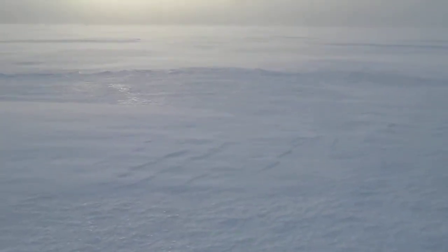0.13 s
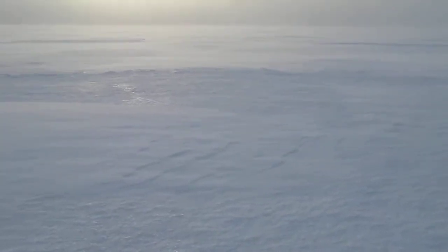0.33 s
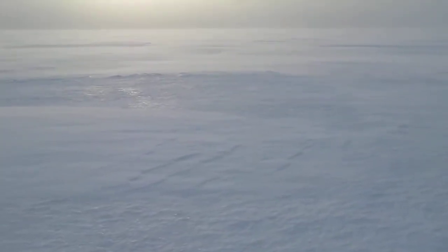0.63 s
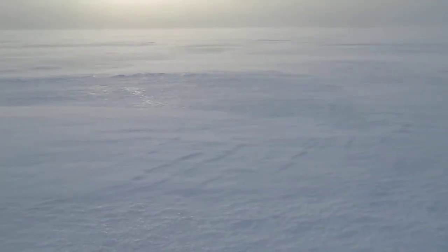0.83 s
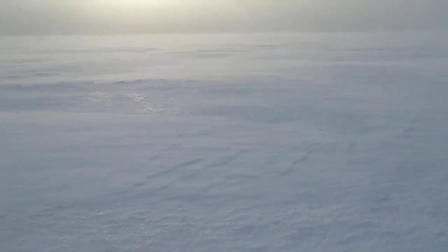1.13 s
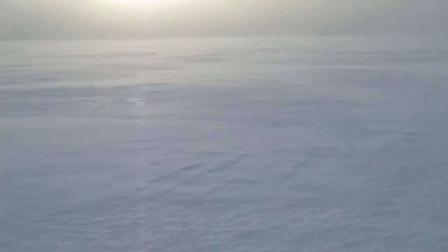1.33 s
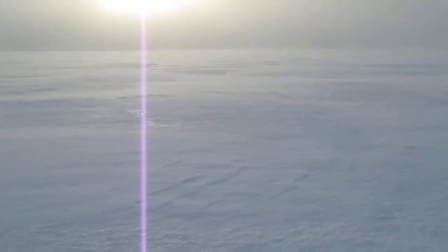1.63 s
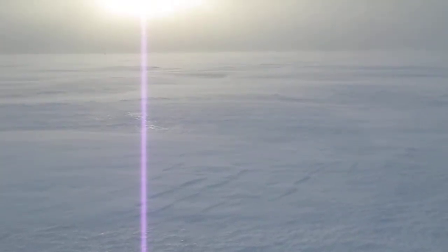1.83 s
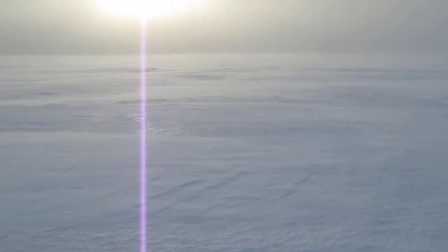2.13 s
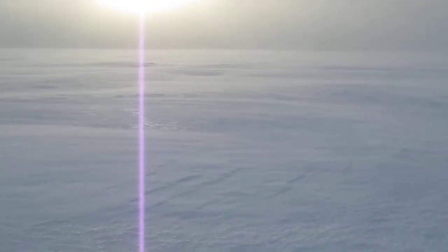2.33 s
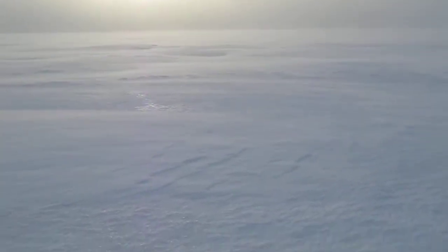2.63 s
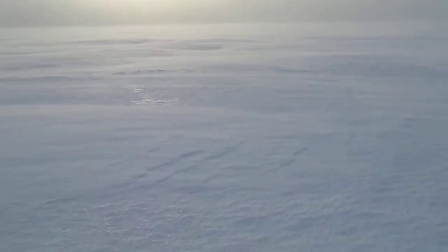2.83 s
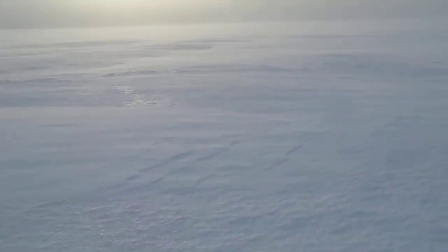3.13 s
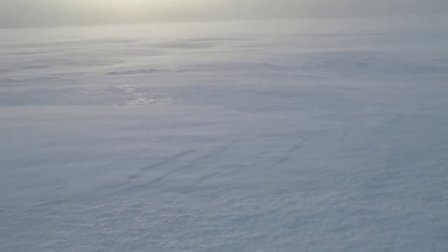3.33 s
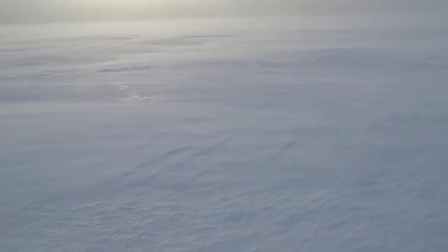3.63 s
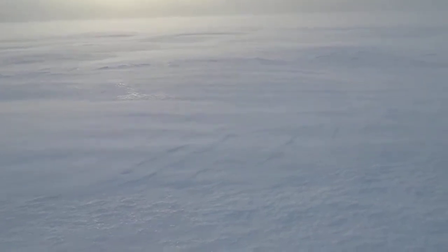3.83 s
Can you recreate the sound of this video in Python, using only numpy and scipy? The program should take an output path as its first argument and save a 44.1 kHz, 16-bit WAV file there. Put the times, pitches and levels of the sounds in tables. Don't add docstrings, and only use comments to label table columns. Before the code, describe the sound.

Wind rumbles quietly over open snow with soft puffs, then a violent thump and clipped slap hit the exposed microphone; a brush, crisp crunching and ice ticks follow before a gale roars in.

```python
import sys
import numpy as np
from scipy import signal
from scipy.fft import rfft, irfft, next_fast_len
from scipy.io import wavfile
from scipy.ndimage import map_coordinates

SR = 44100
rng = np.random.default_rng(int(sys.argv[2]) if len(sys.argv) > 2 else 0)


def volts(x):
    e = np.asarray(x, float) / 20
    return 10 ** e


def master(y):
    cut = np.clip(np.atleast_2d(y).T, -1, 1)
    pcm = np.round(cut * 32767)
    wavfile.write(sys.argv[1], SR, pcm.astype(np.int16))


N = 176400

# freq_hz, density_db
HISS_COLOUR = [(290, -16.5), (500, -6.5), (944, -12.5), (1260, -18), (2870, -22.5), (3360, -21),
               (4970, -26.5), (8720, -19.5), (15800, -37)]
# start_s, rise_s, hold_s, fall_s, level_db
FAR_BRUSHES = [
    (.3, 0.018, 0.29, 0.014, -62.5),
    (.7, 0.074, 0.1, 0.6, -60),
    (.9, .05, 0.2, 0.037, -72.5),
    (1.3, 0.29, 0.47, 0.04, -67.5),
    (2.8, 0.036, .18, .1, -67),
]
# freq_hz, density_db
FAR_BRUSH_COLOUR = [(1180, -28), (2000, -2), (2870, -2.5), (3270, 1), (4620, 3.5), (6640, -0.5),
                    (8390, 6.5), (9390, 3.5), (15800, -41)]
# start_s, rise_s, hold_s, fall_s, level_db
NEAR_STROKES = [
    (2.19, 0.011, 0.11, 0.043, -54),
    (2.572, 0.013, 0.0071, 0.023, -56.5),
    (2.293, 0.071, 0.016, 0.17, -44.5),
    (2.51, 0.052, 0.014, 0.15, -53.5),
    (2.615, 0.024, 0.041, 0.045, -61),
    (2.685, 0.03, 0.021, 0.043, -37),
]
# freq_hz, density_db
CLOTH_COLOUR = [(710, -10), (1200, -2), (1550, -3), (2120, -7.5), (2810, -5.5), (4100, -9.5), (8350, 1),
                (9810, -2.5), (15800, -31.5)]
# start_s, hold_s, fall_s, level_db, treble_edge_hz
CRUNCHES = [(2.718, 0.028, 0.044, -30.5, 8000), (2.778, 0.015, 0.072, -54.5, 4530),
            (2.86, 0.0026, 0.04, -34.5, 5630), (2.883, 0.027, 0.15, -50.5, 4530),
            (2.987, 0.024, 0.029, -36.5, 4900), (3.04, 0.037, 0.03, -38.5, 4740),
            (3.112, 0.128, 0.022, -44, 3560), (3.182, 0.12, 0.034, -45.5, 4570),
            (3.277, 0.028, 0.077, -36, 3500), (3.34, 0.027, 0.077, -39.5, 2700),
            (3.508, 0.074, 0.034, -40.5, 3940), (3.874, 0.093, 0.051, -69, 4100),
            (3.589, 0.5, 0.09, -36, 1870), (3.386, 0.19, .1, -40.5, 2440)]
# start_s, peak_db, pitch_hz
ICE_TICKS = [(0.4462, -38.5, 6000), (1.4196, -43, 3000), (2.1596, -7, 1300), (2.586, -45, 8000),
             (2.7785, -11, 4000), (2.789, -41, 9000), (2.793, -29, 4000), (2.801, -30, 3500),
             (2.8143, -26.5, 5500), (2.8565, -46, 7000), (2.8784, -23, 6500), (2.8974, -42, 9000),
             (2.915, -23, 3070), (2.9296, -27, 2140), (2.9418, -29.5, 4000), (2.963, -43, 2500),
             (2.988, -42, 2500), (3.0077, -30.5, 6000), (3.021, -36, 6000), (3.099, -30, 4970),
             (3.05, -20, 3840), (3.087, -29, 6000), (3.1147, -31, 4470), (3.1543, -36, 5000),
             (3.1723, -40, 5970), (3.181, -41, 6000), (3.1975, -31, 4500), (3.2104, -39, 9000),
             (3.2234, -30, 5000), (3.2445, -37, 8000), (3.259, -33, 8000), (3.249, -27, 6000),
             (3.267, -25.5, 4970), (3.294, -38, 6000), (3.309, -24, 4400), (3.332, -30, 6000),
             (3.372, -27, 5000), (3.379, -21.5, 1980), (3.376, -32, 5000), (3.437, -35, 5000),
             (3.4475, -34, 4000), (3.508, -27, 3000), (3.531, -26, 4740), (3.541, -23, 4500),
             (3.5517, -23, 4950), (3.555, -27, 5000), (3.577, -23.5, 3500), (3.618, -26.5, 6000),
             (3.713, -19, 4950), (3.848, -37, 9000), (3.873, -28, 5000), (3.888, -27, 5000),
             (3.906, -40, 4960), (3.941, -21, 5000), (3.959, -24, 2970)]
# start_s, peak_db, treble_edge_hz
PORT_KNOCKS = [
    (3.1933, -11, 4170),
    (3.4229, -16.5, 4770),
    (3.9993, -8, 6040),
]
# start_s, rise_s, hold_s, fall_s, level_db
FLUTTERS = [
    (2.28, 0.012, 0.038, 0.041, -22.5),
    (2.389, .02, 0.034, 0.041, -42.5),
    (2.473, 0.0091, 0.037, 0.041, -33),
    (2.545, 0.013, .13, 0.12, -31),
    (3.19, 0.023, 0.25, .1, -30.5),
    (3.493, 0.032, 0.57, .04, -22.5),
    (3.675, .005, 0.015, 0.032, -12.5),
]
# freq_hz, density_db
FLUTTER_COLOUR = [(70, -18), (130, 2.5), (300, -7), (600, -18), (1000, -26.5), (1500, -43.5), (3000, -120)]
# time_s, level_db
WIND_STRENGTH = [(0, -42.5), (0.449, -47), (1.2, -44), (1.35, -40.5), (1.62, -39.5), (1.84, -39),
                 (2.061, -28.5), (2.167, -20.5), (2.229, -38), (2.45, -42.5), (2.55, -33.5), (2.8, -35.5),
                 (3.15, -30.5), (3.22, -26.5), (3.456, -19.5), (3.472, -11), (3.75, -6), (4, -4)]
# freq_hz, density_db
EDDY_COLOUR = [(24, -37), (40, -4), (75, 2), (152, -5), (329, -18), (386, -21.5), (600, -30.5),
               (780, -36.5), (1320, -120)]
# freq_hz, density_db
ROAR_COLOUR = [(150, -69.5), (300, -6.5), (600, -15), (1200, -21.5), (2200, -31), (4000, -38.5),
               (7000, -53), (15000, -86)]
# freq_hz, density_db
HEAVE_COLOUR = [(8, -37), (22, 4.5), (45, 5.5), (70, -4), (120, -51.5), (500, -130)]
# centre_s, peak_db, pitch_hz, length_s
PUFFS = [(0.453, -38.5, 190, 0.022), (0.477, -25, 254, 0.0098), (.737, -25.5, 240, 0.019),
         (0.788, -31.5, 199, 0.017), (0.862, -26.5, 189, 0.0081), (0.979, -25, 117, 0.046),
         (1.52, -27, 117, 0.06), (1.737, -38, 68, 0.063), (1.922, -14.5, 192, 0.044),
         (2.084, -15.5, 220, 0.041), (2.1245, -15, 120, 0.012), (2.129, -9, 590, .004),
         (2.135, -3.5, 245, 0.014), (2.148, 0.5, 330, 0.017), (2.161, 0.5, 450, 0.012),
         (2.164, -6, 750, 0.0034), (2.171, -6, 357, 0.012), (2.304, -15, 200, 0.015),
         (2.315, -19, 127, 0.02), (2.324, -21, 507, 0.011), (2.354, -23.5, 447, 0.0076),
         (2.43, -25.5, 239, 0.025), (2.486, -28.5, 400, 0.017), (2.563, -21.5, 247, 0.018),
         (2.613, -24, 300, 0.012), (2.646, -19.5, 500, 0.0055), (3.491, 6, 48, 0.059),
         (1.404, -22.5, 46, 0.16), (2.749, -29.5, 242, 0.044), (3.061, -29, 300, 0.085),
         (3.682, -2, 111, 0.045), (3.965, -0.5, 149, 0.037), (.999, -27, 60, 0.027),
         (1.325, -26, 87.4, 0.058), (1.6, -36, 200, 0.025), (2.075, -16, 70, 0.082),
         (.7365, -35, 442, 0.0046), (1.915, -25, 130, 0.022), (2.084, -25, 476, 0.0079),
         (3.468, -7, 90, 0.024), (3.686, -10, 330, .01), (3.725, -6, 131, 0.015), (3.785, 1, 100, 0.023),
         (3.842, -4, 150, .015), (3.968, -9.5, 350, 0.014)]

HISS_DB, WHINE_DB, WHINE_HZ = -60.5, -75.5, 3290
CLOTH_ROUGH_DB, FLUTTER_ROUGH_DB = 1.2, 3
CRUNCH_RISE_S, CRUNCH_LOW_HZ, CRUNCH_ROUGH_DB = 0.016, 300, 1.5
GRAIN_DB, GRAIN_SPREAD_DB, GRAINS_PER_S = -12, 3, 220
PORT_HZ = 9720
TICK_REL_WIDTH, TICK_EDGE_RATIO = 2.6, 1.88
LUMPY_DB = 2
ROAR_DB, ROAR_GROWS = -21.5, 0.97
HEAVE_DB, HEAVE_GROWS = -10.5, 0.7
PUFF_BUILD_RATIO = 0.45
PUFF_REL_WIDTH, PUFF_DIP = 1.7, 1.64
PUSH_S, PUSH_DB, PUSH_WIDTH_S = 2.1277, -5, 0.001
SLAP_S, SLAP_DB, SLAP_WIDTH_S = 2.1326, 5, 0.00025
DUCK_DB, DUCK_S, DUCK_RISE_S, DUCK_HOLD_S, DUCK_BACK_S = -10, 2.134, 0.00081, 0.051, 0.071
GALE_DB, GALE_S, GALE_RISE_S = -12, 3.205, 0.39
CLIP_AT = 0.709


def unit(x):
    return x / np.sqrt(np.mean(x ** 2) + 1e-20)


def clock():
    return np.arange(N) / SR


def wobble(rate_hz):
    return map_coordinates(rng.standard_normal(2000), [clock() * rate_hz])


def filtered(x, response):
    size = next_fast_len(N + 8192)
    return irfft(rfft(x, size) * response(np.fft.rfftfreq(size, 1 / SR)), size)[..., :N]


def noise(colour):
    hz, db = np.transpose(colour)
    response = lambda f: volts(np.interp(np.log(f + 1), np.log(hz + 1), db))
    return unit(filtered(rng.standard_normal(N), response))


def stroke(start_s, rise_s, hold_s, fall_s):
    t = clock() - start_s
    rise = np.clip(t / rise_s, 0, 1) ** 2
    return rise * volts(-20 * np.clip(t - rise_s - hold_s, 0, None) / fall_s)


def strokes(rows):
    return sum(volts(db) * stroke(start, rise, hold, fall) for start, rise, hold, fall, db in rows)


def band(f, hz, rel_width):
    damping = 1j * f * hz * rel_width
    return damping / (hz * hz - f * f + damping)


def camera():
    shape = stroke(1.18, 0.03, 0.14, 0.04) + stroke(1.42, 0.03, 0.17, 0.04)
    phase = 2 * np.pi * WHINE_HZ * clock() + 1.2 * wobble(20)
    whine = shape * volts(2.5 * wobble(15)) * np.sin(phase)
    return volts(HISS_DB) * noise(HISS_COLOUR) + volts(WHINE_DB) * whine


def sleeve():
    out = np.zeros(N)
    for rows, colour in ((FAR_BRUSHES, FAR_BRUSH_COLOUR), (NEAR_STROKES, CLOTH_COLOUR)):
        rough = volts(CLOTH_ROUGH_DB * (wobble(25) + wobble(200)))
        out += strokes(rows) * unit(rough * noise(colour))
    return out


def crunch():
    out = np.zeros(N)
    for start, hold, fall, db, edge_hz in CRUNCHES:
        def dense_response(f):
            low_cut = 1j * f / (CRUNCH_LOW_HZ + 1j * f)
            return low_cut / (1 + 1j * f / 1500) ** 0.5 / (1 + (f / edge_hz) ** 2.6)

        chance, size = rng.random((2, N))
        grains = (chance < GRAINS_PER_S / SR) * volts(-GRAIN_SPREAD_DB * np.log(size + 0.03))
        sharp = unit(filtered(grains, lambda f: band(f, 1.3 * edge_hz, 1.4)))
        rough = volts(CRUNCH_ROUGH_DB * (wobble(60) + wobble(300)))
        dense = unit(filtered(rough * rng.standard_normal(N), dense_response))
        grain_gain = volts(GRAIN_DB) * min(edge_hz / 4000, 1)
        out += volts(db) * stroke(start, CRUNCH_RISE_S, hold, fall) * (dense - grain_gain * sharp)
    return filtered(out, lambda f: 1 / (1 + (f / PORT_HZ) ** 4.5))


def blow(f, hz):
    return band(f, hz, 1.4) / (1j * f + 1) * np.exp(-2j * np.pi * f * 0.0004)


def ticks():
    out, f = np.zeros(N + SR), np.fft.rfftfreq(512, 1 / SR)
    for start, db, hz in ICE_TICKS:
        treble_cut = 1 + (f / (TICK_EDGE_RATIO * hz)) ** 5
        spike = irfft(band(f, hz, TICK_REL_WIDTH) * blow(f, 2 * hz) / treble_cut)
        out[round(start * SR):][:512] -= volts(db) * spike / spike.max()
    return out[:N]


def knocks():
    out, f = np.zeros(N + SR), np.fft.rfftfreq(512, 1 / SR)
    for start, db, edge_hz in PORT_KNOCKS:
        spike = irfft(blow(f, 2 * edge_hz) * edge_hz / (edge_hz + 1j * f))
        out[round(start * SR):][:512] -= volts(db) * (spike - spike[0]) / spike.max()
    return out[:N]


def flutter():
    return strokes(FLUTTERS) * unit(volts(FLUTTER_ROUGH_DB * wobble(70)) * noise(FLUTTER_COLOUR))


def wind():
    time_s, db = np.transpose(WIND_STRENGTH)
    strength_db = np.interp(clock(), time_s, db)
    top_db = strength_db.max()

    def follow(level_db, grows):
        return volts(top_db + level_db + grows * (strength_db - top_db))

    lumps = wobble(9.2) + 0.73 * wobble(40)
    eddies = unit(volts(LUMPY_DB * lumps) * noise(EDDY_COLOUR))
    roar = unit(volts(1.15 * lumps + 1.84 * wobble(90)) * noise(ROAR_COLOUR))
    heave = unit(volts(2.5 * wobble(6)) * noise(HEAVE_COLOUR))
    out = volts(strength_db) * eddies
    out += follow(ROAR_DB, ROAR_GROWS) * roar
    return out + follow(HEAVE_DB, HEAVE_GROWS) * heave


def puffs():
    out, t = np.zeros(N + SR), (np.arange(8192) - 4096) / SR
    f = np.fft.rfftfreq(len(t), 1 / SR)
    for centre, db, hz, length in PUFFS:
        response = band(f, hz, PUFF_REL_WIDTH) / (1 + (f / (1.6 * hz)) ** 3.2)
        swing = unit(irfft(rfft(rng.standard_normal(len(t))) * response))
        shape = volts(-20 * np.where(t > 0, t, -t / PUFF_BUILD_RATIO) / length)
        dip = np.cos(2 * np.pi * hz * t) * np.exp(-(2.43 * hz * t) ** 2)
        puff = (shape * swing - PUFF_DIP * dip) / 2
        out[round(centre * SR) - 4096:][:len(t)] += volts(db) * puff
    return out[:N]


def diaphragm_slap():
    push = volts(PUSH_DB) * np.exp(-((clock() - PUSH_S) / PUSH_WIDTH_S) ** 2)
    slap = volts(SLAP_DB) * np.exp(-((clock() - SLAP_S) / SLAP_WIDTH_S) ** 2)
    return push - slap


def scene():
    handling = camera() + sleeve()
    snow = crunch() + ticks() + knocks()
    air = flutter() + wind() + puffs() + diaphragm_slap()
    return (handling + snow + air)[None]


def roll_off(x):
    return signal.sosfilt(signal.butter(12, 15910, fs=SR, output="sos"), x)


def record(dry):
    duck_db = DUCK_DB * stroke(DUCK_S, DUCK_RISE_S, DUCK_HOLD_S, DUCK_BACK_S)
    gale_db = GALE_DB * np.clip((clock() - GALE_S) / GALE_RISE_S, 0, 1)
    mix = np.clip(dry * volts(duck_db + gale_db), -CLIP_AT, CLIP_AT)
    return roll_off(mix)


dry = scene()
out = record(dry)
master(out)
```